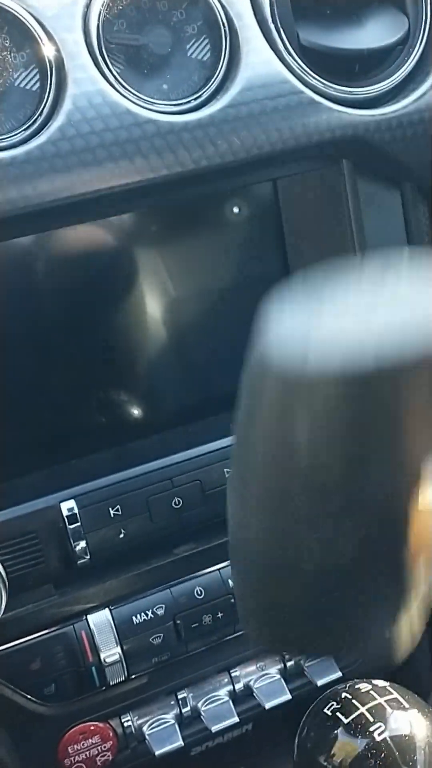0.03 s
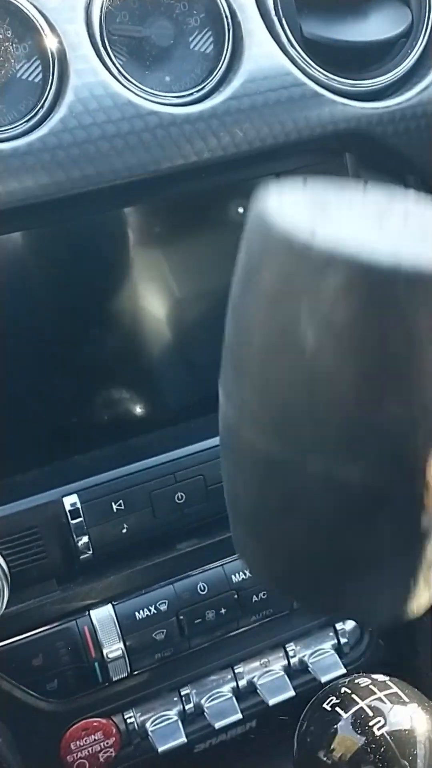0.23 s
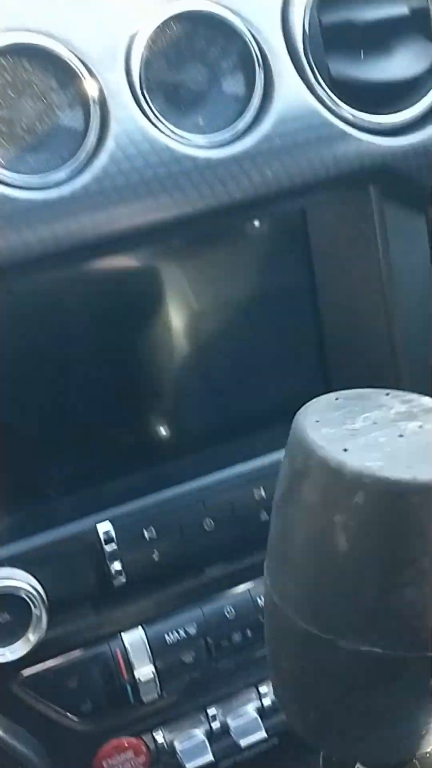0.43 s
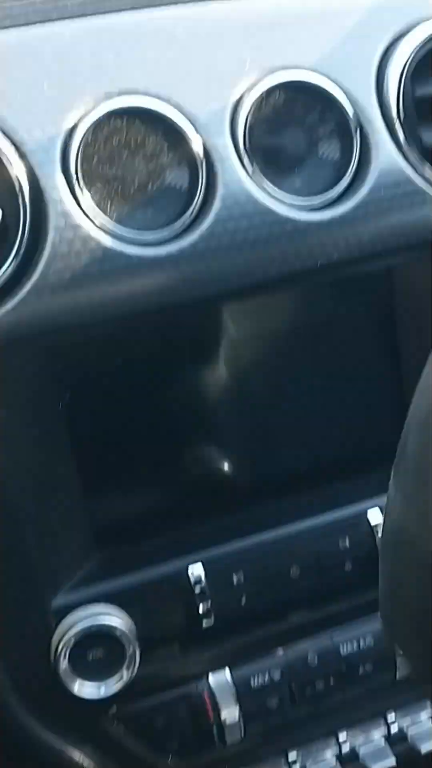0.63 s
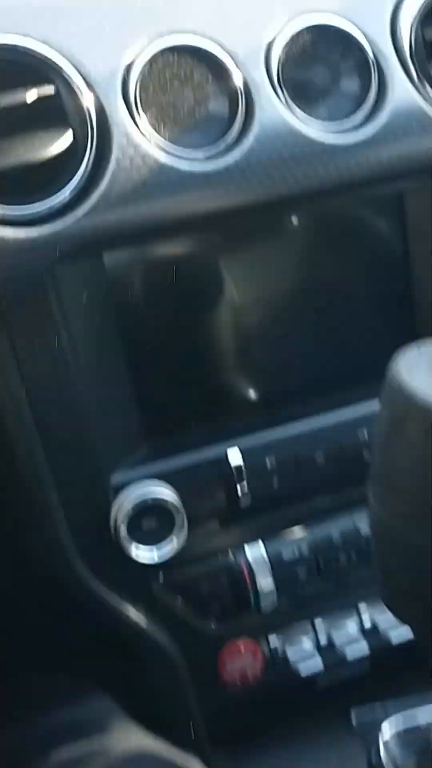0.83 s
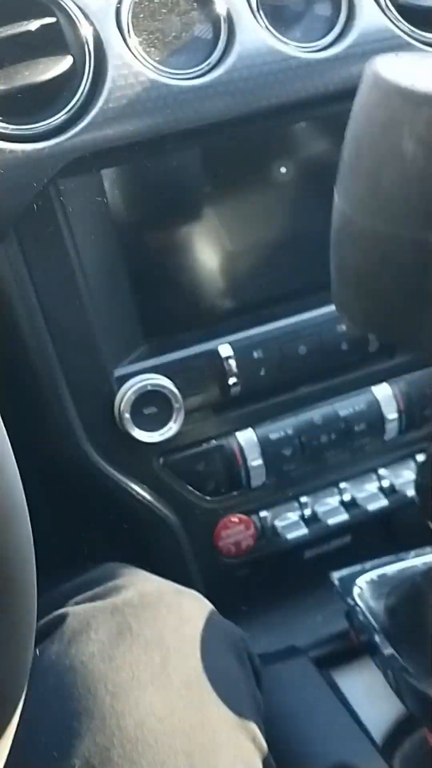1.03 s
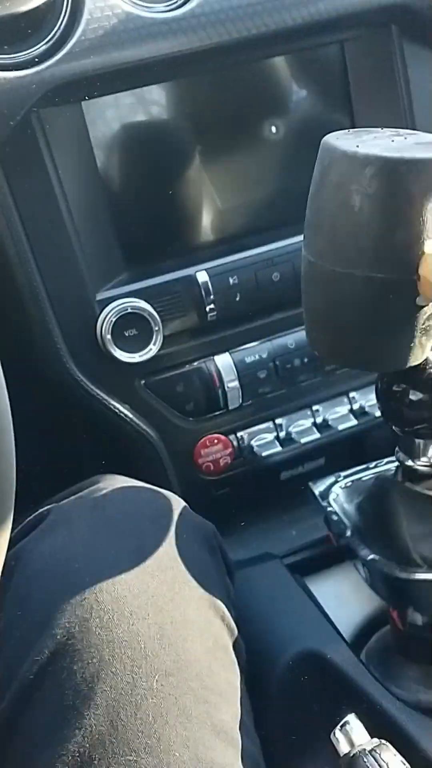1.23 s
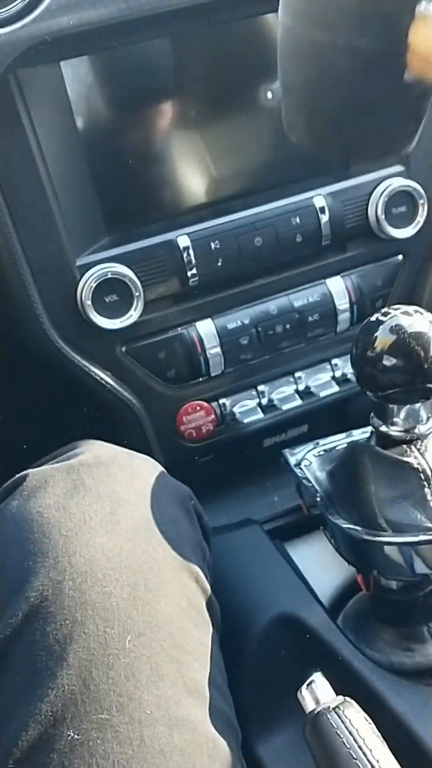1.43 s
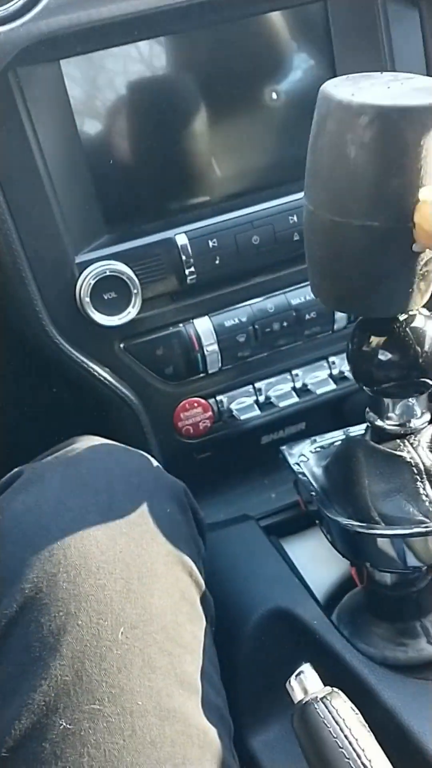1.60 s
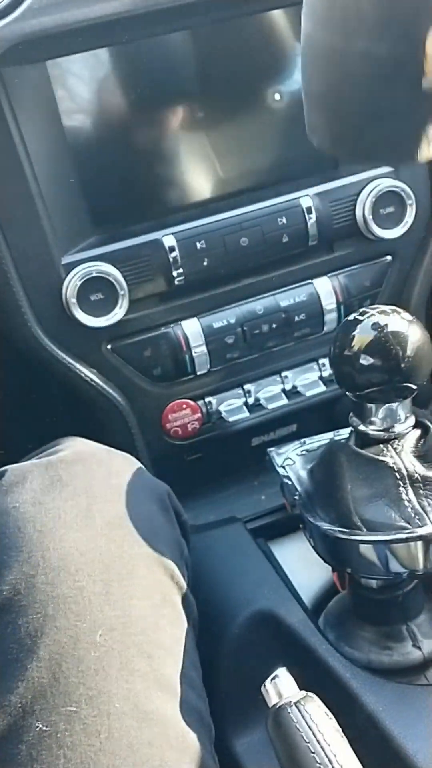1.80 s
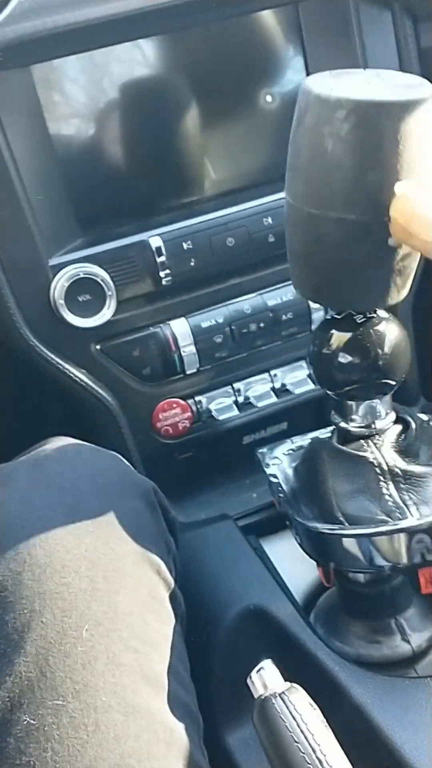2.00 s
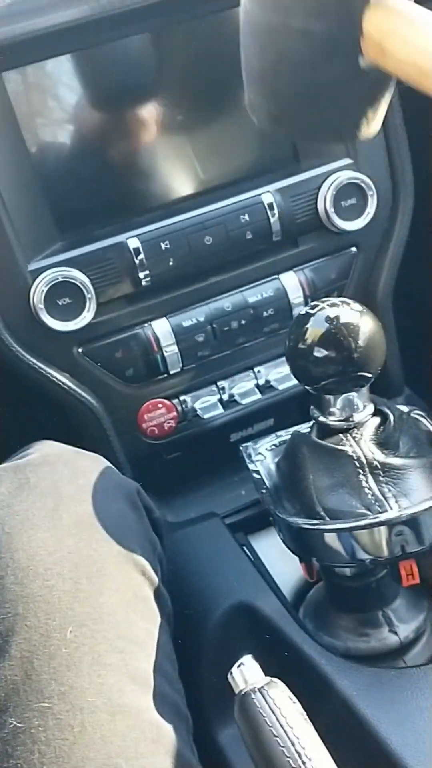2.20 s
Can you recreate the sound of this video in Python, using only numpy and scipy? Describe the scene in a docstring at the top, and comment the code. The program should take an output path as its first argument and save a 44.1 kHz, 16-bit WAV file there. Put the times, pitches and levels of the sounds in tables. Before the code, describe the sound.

A rubber mallet hits a gear shifter six times, at about 0.2, 0.6, 1.0, 1.3, 1.7 and 2.1 seconds. Each blow is a low thump with a metallic clack and a short boom in the closed car. The first two are brightest, and the first three add sharp metal ticks on the left. About 0.1 seconds after each of the last four comes a light rattling rebound. A faint low rumble lies underneath.

```python
"""A thump and a clack break a faint low rumble: a rubber mallet on a gear shifter's knob, six blows,
heard from a stereo microphone inside the closed car. Each blow sets lever, console and cabin swinging
and makes the linkage clack; the first three add sharp metal ticks on the left. After the last four the
mallet drops back on the knob with a small rattle. A noise suppressor lowers the rumble in between."""
import sys
import numpy as np
from scipy import signal
from scipy.fft import rfft, irfft
from scipy.io import wavfile
from scipy.ndimage import uniform_filter1d

SR = 44100
rng = np.random.default_rng(int(sys.argv[2]) if len(sys.argv) > 2 else 0)


def to_wav(sig):
    """Store sig (one row per channel, or 1-D mono) as 16-bit WAV at the path in sys.argv[1].

    Samples outside -1..1 are clipped; the rate is SR.
    """
    pcm = np.clip(np.atleast_2d(sig), -1, 1) * 32767
    pcm = np.round(pcm).astype(np.int16)
    wavfile.write(sys.argv[1], SR, pcm.T)  # frames by channels


N = 103635

# Mallet on the knob: t/s, thump level/dB, hollow-mode boost/dB, then clack level/dB at each CLACK_HZ
BLOWS = [(.198, -1, 0.5, -25, -28, -23, -21.5, -18.5), (.572, -1, -1.5, -23.5, -28.5, -17.5, -28, -28),
         (0.953, -3, -2.5, -32.5, -32.5, -34.5, -33.5, -34.5),
         (1.315, -3, 1.5, -32, -31, -32.5, -35.5, -37.5), (1.719, -3, 3, -29.5, -25.5, -26.5, -33, -32.5),
         (2.115, -2.5, 2.5, -29.5, -31, -26, -35, -37.5)]
# Colour of the linkage's clack: f/Hz, relative level/dB
LINKAGE_COLOUR = [(200, -25.5), (450, 12), (580, 1), (750, 6.5), (1100, -1.5), (1550, 7.5), (2300, 3),
                  (3100, -9.5), (4200, 0), (5000, 0.5), (6200, -3), (7600, 1), (10000, 1), (11800, -11.5),
                  (15000, -4.5), (16300, -33.5)]
# Ringing of the metal linkage: f/Hz, width/Hz, level/dB above that colour
LINKAGE_RINGS = [(689.3, 40, -0.5), (800, 50, 4), (1500, 73, 5), (2000, 110, 2.5), (2270, 59, 5),
                 (2580, 53, 5.5), (3950, 135, 4.5), (4390, 150, 4), (4857, 88, 10.5), (7270, 130, 10.5),
                 (7900, 100, -3.5), (8200, 200, -5.5), (8870, 120, 3.5), (9850, 140.8, 2.5)]

def blows(mix, t):
    """Full blows: the rubber squashes before the linkage meets its stop."""
    squash_s = .0076
    for start, *levels in BLOWS:
        add(mix, start, knock(t, squash_s, LINKAGE_COLOUR, LINKAGE_RINGS, *levels))

# Mallet dropping back: columns as in BLOWS
REBOUNDS = [(1.0727, -23.5, -4, -36, -36, -43.5, -39.5, -37), (1.445, -25, -7, -37, -38, -39.5, -38, -43),
            (1.816, -29, -10.5, -47, -44, -46, -59.5, -44), (2.195, -28, -6.5, -63, -60.5, -70, -68, -72)]
# Colour of its light tap: f/Hz, relative level/dB
TAP_COLOUR = [(200, -5), (500, 0), (700, -5), (820, 0.5), (950, -13), (1500, -0.5), (2400, 10.5),
              (3150, -1.5), (3800, 2.5), (5000, -1), (6500, -7.5), (8500, -4.5), (10500, -17.5),
              (15000, -25), (16300, -32.5)]
# Ringing of knob and mallet: f/Hz, width/Hz, level/dB above that colour
TAP_RINGS = [(1125, 118, 15.5), (1332, 52, 9.5), (1650, 41, -14), (2180, 47, -5), (2610, 66, 6),
             (3760, 88, -3), (4120, 110, 7), (7780, 99, 10)]

def rebounds(mix, t):
    """The mallet falls back on the knob: a lighter tap with a quicker rise."""
    rise_s = .0023
    for start, *levels in REBOUNDS:
        add(mix, start, knock(t, rise_s, TAP_COLOUR, TAP_RINGS, *levels))

def knock(t, rise_s, colour, rings, thump_db, hollow_db, *clack_db):
    """One contact of mallet and knob: thump, cabin boom and clack, with a breath of hiss."""
    body = hiss_swell(t, rise_s) + cabin_boom(t) + thump(t, hollow_db)
    return amp(thump_db) * body + clack(t, rise_s, colour, rings, clack_db)

# Modes of lever, console and cabin: f/Hz, level/dB, T60/s, build-up/s, left minus right/dB
BODY_MODES = [(57.08, -17.5, .284, 0.031, 1), (67.17, -16.5, 0.323, 0.005574, -1),
              (73.39, -24, 0.51, 0.032, -5), (87, -12.5, .225, 0.028, -1), (118.7, -8.5, 0.21, 0.016, -2.5),
              (126, -20, .34, 0.015, 0), (163.7, -7, .158, .04, 2.5), (190.8, -4, .095, 0.028, -1.5),
              (243.8, -21.5, 0.16, 0.022, -5.5), (282.1, -28.5, .201, .003, 5),
              (310, -3.5, 0.067, 0.025, 3.5), (357.1, -14.5, 0.1, .022, 7), (419.1, -19.5, .12, .018, -1),
              (462.6, -20, 0.098, .02, 16)]
# Phase between the two sides of the microphone: f/Hz, phase/rad
BODY_PHASE = [(50, .04), (120, 0.13), (190, 0.15), (300, 0.34), (480, .9)]

def thump(t, hollow_db):
    """The mallet pushes the lever down; low modes build up and die away."""
    hollow_above_hz, top_mode_hz = 330, BODY_MODES[-1][0]
    out = np.zeros((2, len(t)))
    for hz, db, t60, build, pan_db in BODY_MODES:
        gain = sides(pan_db) * amp(db + hollow_db * (hz > hollow_above_hz))
        drift = 1 + .012 * (hz / top_mode_hz) * rng.standard_normal()  # upper modes vary most per knock
        phase = np.array([[.5], [-.5]]) * read(BODY_PHASE, hz)
        out -= gain * swell(t, build, t60) * np.sin(2 * np.pi * hz * drift * t + phase)
    return out

# Where each contact's clack levels apply: f/Hz
CLACK_HZ = [800, 2000, 4500, 8000, 14000]
# Decay of the clack: f/Hz, T60/s
CLACK_T60 = [(300, 0.29), (700, 0.17), (1400, .1), (2500, .1), (4500, 0.068), (8000, 0.073), (14000, 0.07)]
# Its balance at the microphone: f/Hz, left minus right/dB
CLACK_PAN = [(300, 1), (1500, -1.5), (4500, -5.5), (6000, -2.5), (8000, 5), (15000, 2.5)]
# Its spill across the microphone: f/Hz, share of each side heard on the other
CLACK_SPILL = [(300, 0.67), (1000, .17), (2500, 0), (5000, 0), (16000, 0)]

def clack(t, rise_s, colour, rings, levels_db):
    """Hard parts meet: dense modes swell, hold and die, the treble first."""
    hold_s, squash_db = .0013, -25.5
    direct_s, direct_db = .0039, 2  # the direct sound stands briefly above the reflections
    chatter_s, chatter_db = .0018, 1.5  # loose parts make the contact uneven
    hz = np.fft.rfftfreq(len(t), 1 / SR)
    rings_db = sum(db / (1 + (2 * (hz - f) / width) ** 2) for f, width, db in rings)
    gain = amp(read(list(zip(CLACK_HZ, levels_db)), hz) + rings_db) * sides(read(CLACK_PAN, hz))
    spectrum = rfft(noise(colour, len(t)))
    spectrum = gain * (spectrum + read(CLACK_SPILL, hz) * spectrum[::-1])
    centres, t60s = np.transpose(CLACK_T60)
    age = np.maximum(t - rise_s - hold_s, 0)
    ring = np.zeros((2, len(t)))
    for weights, t60 in zip(np.eye(len(centres)), t60s):
        band = read(list(zip(centres, weights)), hz)
        ring += irfft(spectrum * band, len(t)) * decay(age, t60)
    chatter = uniform_filter1d(rng.standard_normal(len(t)), round(chatter_s * SR))
    envelope_db = squash_db * np.maximum(1 - t / rise_s, 0)
    envelope_db += direct_db * (np.exp(-(age / direct_s) ** 2) - 1)
    envelope_db += chatter_db * np.tanh(chatter / chatter.std())
    fade_in = np.minimum(10 * t / rise_s, 1)
    return ring * amp(envelope_db) * fade_in

# Sharp metal ticks: t/s, level/dB on the left
TICKS = [(0.2054, -18.5), (0.2113, -15), (.2200, -22), (.5790, -27.5), (0.5857, -22.5), (0.9616, -32.5),
         (0.9678, -31)]
# Their bright colour: f/Hz, relative level/dB
TICK_COLOUR = [(2000, -26.5), (5500, -20.5), (7500, 2.5), (8600, 4), (10200, 3), (11800, -16),
               (14500, -10.5), (16000, -20)]

def ticks(mix, t):
    """Loose metal chatters for an instant, left of the microphone."""
    hold_s, right_db = .00082, -17.5
    fade = decay(np.maximum(t - hold_s, 0), t60_s=.009)
    for start, db in TICKS:
        add(mix, start, amp([[db], [db + right_db]]) * fade * noise(TICK_COLOUR, len(t)))

# The cabin's low echo: f/Hz, relative level/dB
BOOM_COLOUR = [(40, -28), (120, -14.5), (135, -5), (165, -7), (195, 0.5), (230, -14), (290, -18),
               (385, -15), (520, -28.5), (900, -49), (16000, -91)]

def cabin_boom(t):
    """The closed car answers around the microphone with a low boom."""
    return amp(-35) * noise(BOOM_COLOUR, len(t)) * swell(t, build_s=.045, t60_s=.44)

# Background hiss: f/Hz, relative level/dB
HISS_COLOUR = [(200, -1), (600, 1), (1200, -7.5), (2600, -9), (3500, -16.5), (5000, -24.5), (9000, -33),
               (16000, -37.5)]

def hiss_swell(t, rise_s):
    """Faint background hiss that comes up with each knock and fades as the noise suppressor closes."""
    return amp(-58) * noise(HISS_COLOUR, len(t)) * swell(t, rise_s, t60_s=.52)

# Room tone inside the car: f/Hz, relative level/dB
RUMBLE_COLOUR = [(20, -22.5), (40, -13.5), (55, -6.5), (68, -7.5), (85, -1), (106, 1), (130, -10),
                 (148, -16.5), (167, -5), (200, -19.5), (250, -29.5), (330, -27), (480, -35), (1500, -39),
                 (2800, -42.5), (3600, -49), (16000, -55)]
# Its width at the microphone: f/Hz, difference between the sides (0 alike, 1 unrelated)
RUMBLE_WIDTH = [(30, .4), (70, .15), (150, .25), (400, .8), (1500, 1)]

def cabin_rumble():
    """Low rumble, nearly alike on both sides, thinning to a trace of wide hiss."""
    left, unrelated = rfft(noise(RUMBLE_COLOUR, N))
    width = read(RUMBLE_WIDTH, np.fft.rfftfreq(N, 1 / SR))
    right = np.sqrt(1 - width ** 2) * left + width * unrelated
    return amp(-53) * irfft(np.array([left, right]), N)

def amp(db):
    """Decibels to gain."""
    return 10 ** (np.asarray(db) / 20)

def sides(pan_db):
    """Left and right gains for a level difference."""
    return amp(np.array([[.5], [-.5]]) * pan_db)

def read(points, hz):
    """Reads a table on a log-frequency axis."""
    f, value = np.transpose(points)
    return np.interp(np.log(hz + 1), np.log(f + 1), value)

def noise(colour, size):
    """Two unrelated noises of unit power with the given colour."""
    gain = amp(read(colour, np.fft.rfftfreq(size, 1 / SR)))
    gain /= np.sqrt(np.mean(gain ** 2))
    return irfft(rfft(rng.standard_normal((2, size))) * gain, size)

def decay(t, t60_s):
    """An exponential fall of 60 dB in t60_s."""
    return np.exp(-np.log(1000) * t / t60_s)

def swell(t, build_s, t60_s):
    """A smooth build-up under an exponential decay."""
    return (1 - np.exp(-(t / build_s) ** 2)) * decay(t, t60_s)

def add(mix, start_s, sound):
    """Lays a stereo sound into the mix."""
    part = mix[:, round(start_s * SR):][:, :sound.shape[1]]
    part += sound[:, :part.shape[1]]

def noise_suppressor(x):
    """The recorder turns down the bass and middle whenever the overall level is low."""
    threshold_db, knee_db, depth_db, top_hz, smooth_s = -47.5, 4, 9.5, 3240, .011
    power = abs(uniform_filter1d((x ** 2).mean(0), round(smooth_s * SR)))
    level_db = 10 * np.log10(power + 1e-12)
    shut = .5 - .5 * np.tanh((level_db - threshold_db) / (2 * knee_db))
    low = signal.sosfiltfilt(signal.butter(4, top_hz, fs=SR, output="sos"), x)
    return x + low * (amp(-depth_db * shut) - 1)

def scene():
    """Inside the car: blows, rebounds and ticks over the cabin's rumble."""
    t = np.arange(round(.6 * SR)) / SR  # the span of one knock
    mix = cabin_rumble()
    blows(mix, t)
    rebounds(mix, t)
    ticks(mix, t[:len(t) // 10])
    return mix

def record(dry):
    """After the microphone: noise suppressor, bass cut and band limit."""
    bass_cut_hz, top_hz = 27, 16100
    hz = np.fft.rfftfreq(2 * N, 1 / SR)
    bass_cut = 1 - np.exp(-(hz / bass_cut_hz) ** 4)
    clear = irfft(rfft(noise_suppressor(dry), 2 * N) * bass_cut)[:, :N]
    band_limit = signal.firwin(255, top_hz, window=("kaiser", 9), fs=SR)
    return signal.oaconvolve(clear, band_limit[None], "same")

dry = scene()
out = record(dry)
to_wav(out)
```